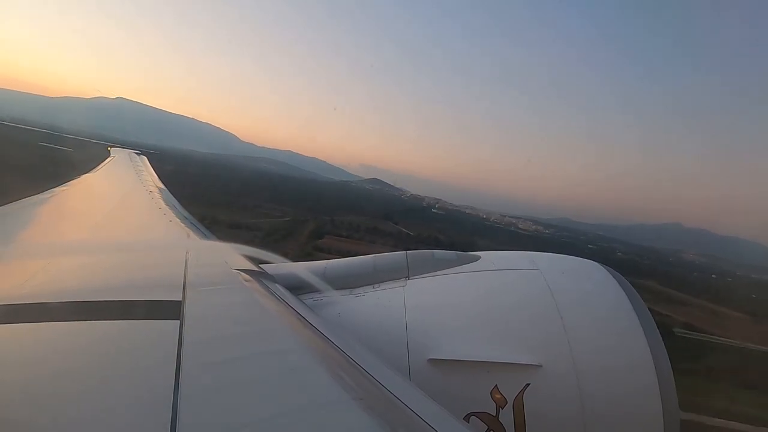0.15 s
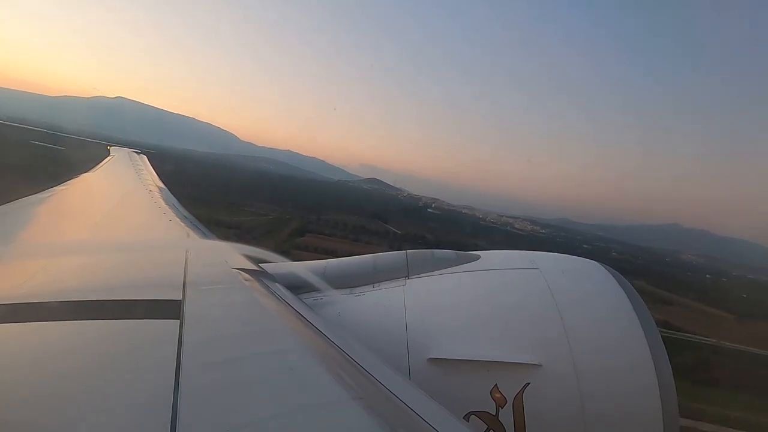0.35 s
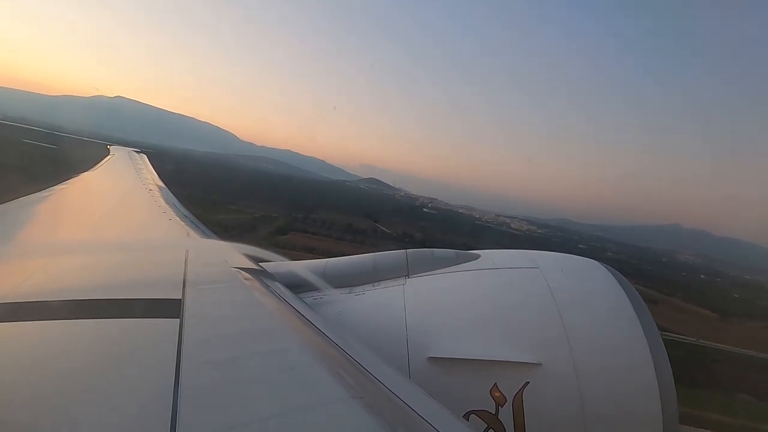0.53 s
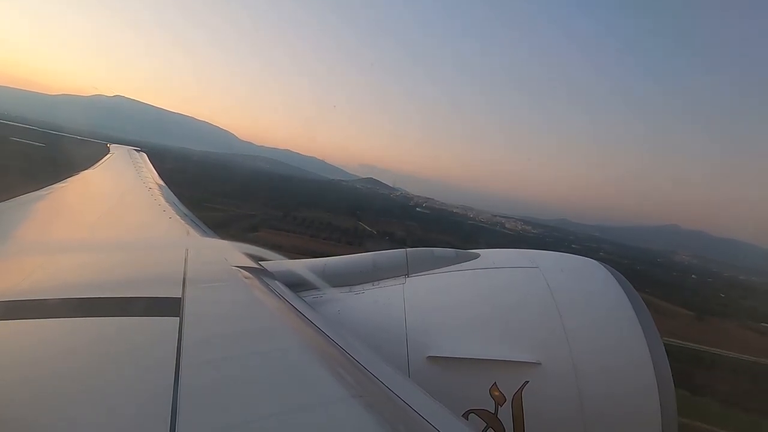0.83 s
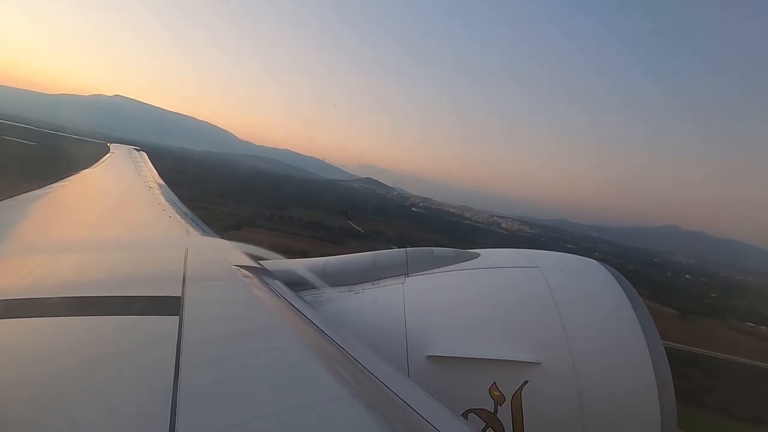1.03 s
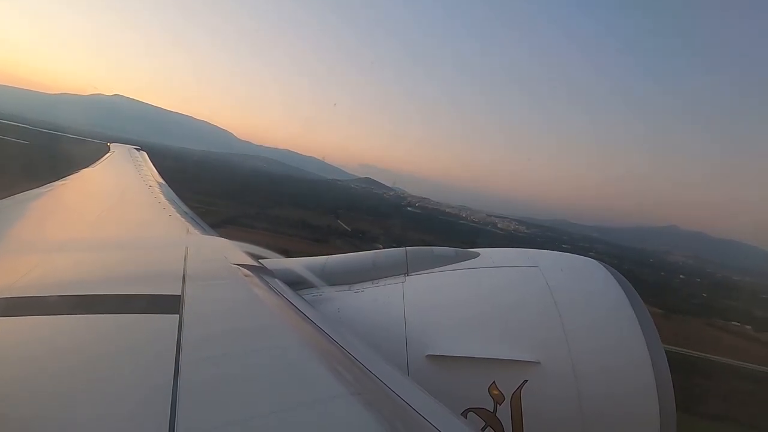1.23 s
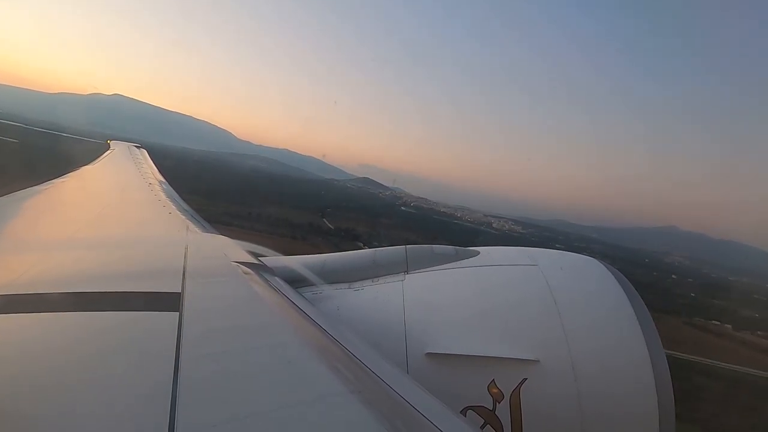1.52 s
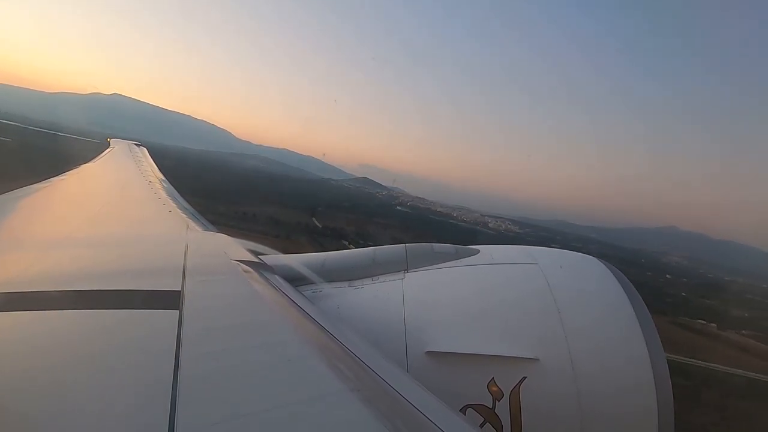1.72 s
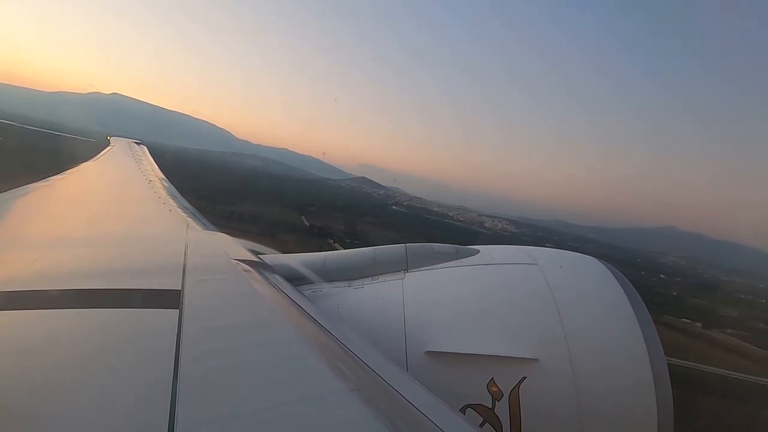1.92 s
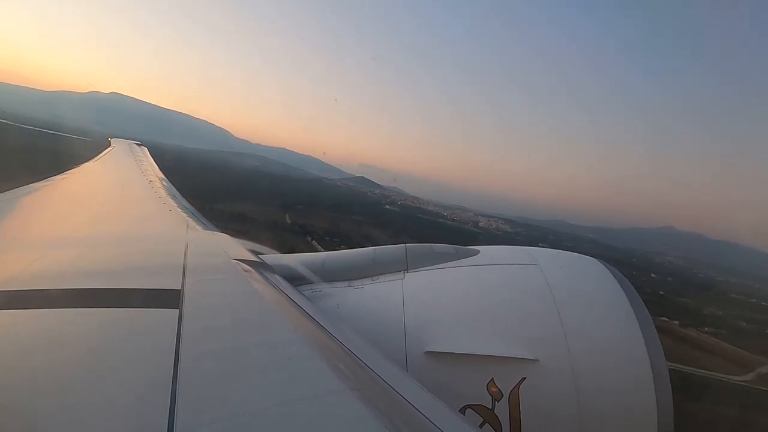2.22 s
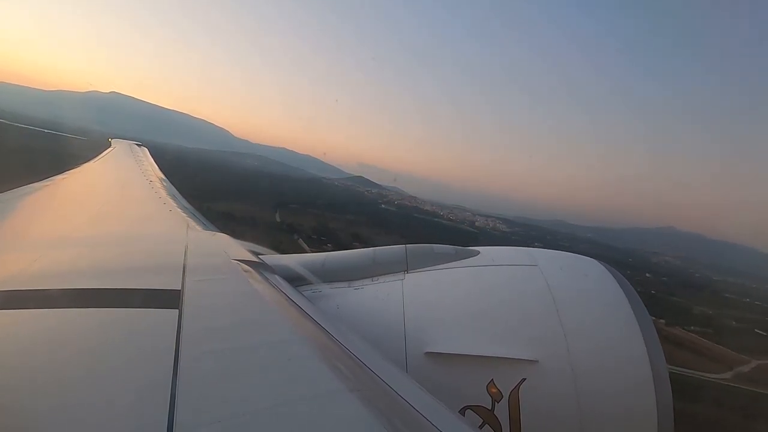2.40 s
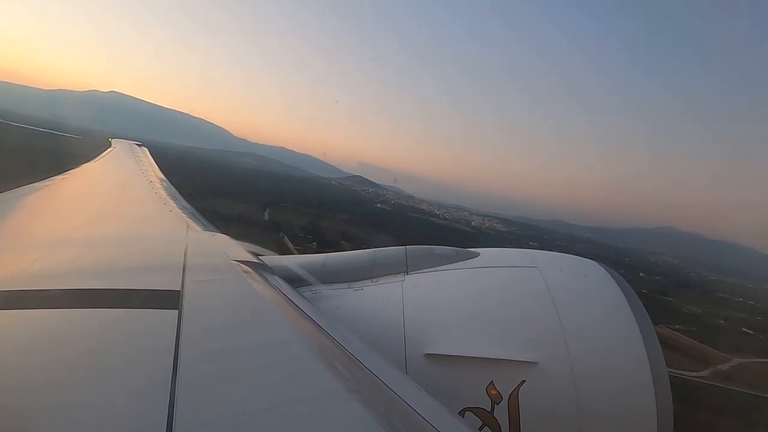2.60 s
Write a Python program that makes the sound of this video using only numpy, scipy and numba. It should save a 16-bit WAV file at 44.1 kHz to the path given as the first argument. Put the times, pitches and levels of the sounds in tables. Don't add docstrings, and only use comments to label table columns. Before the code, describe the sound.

Jet engine roar fills an aircraft cabin during climb: deep, continuous bass rumble, a softer rush of air over the skin, very faint wavering fan whine and tiny plastic ticks, captured on a phone near the window.

```python
import sys
import numpy as np
from scipy import signal
from scipy.fft import rfft, irfft
from scipy.io import wavfile
from scipy.ndimage import uniform_filter1d
from numba import njit

SR = 44100
rng = np.random.default_rng(int(sys.argv[2]) if len(sys.argv) > 2 else 0)


def transcribe(signal):
    frames = np.atleast_2d(signal).T
    limited = np.clip(frames, -1, 1)
    pcm = np.round(limited * 32767).astype(np.int16)
    wavfile.write(sys.argv[1], SR, pcm)


def attenuation_scalar(level_db):
    decades = np.asarray(level_db, float) / 20
    return 10 ** decades


N = 121275
HZ = np.arange(N // 2 + 1) * SR / N
TIME_S = np.arange(N) / SR
CROSSOVER_HZ = 900


def read(table):
    table = np.array(table, float)
    return np.interp(np.log(HZ + 1), np.log(table[:, 0]), table[:, 1])


def level(x, db):
    return x * attenuation_scalar(db) / np.sqrt(np.mean(x ** 2))


def resonance(centre_hz, width_hz):
    return 1 / (1 + (2 * (HZ - centre_hz) / width_hz) ** 2)


def walk(rate_hz):
    hold = int(SR / rate_hz)
    steps = np.repeat(rng.standard_normal(N // 200), hold)[:N + hold]
    smooth = uniform_filter1d(uniform_filter1d(steps, hold), hold)
    return smooth[:N] * np.sqrt(2)


def even(x, share, seconds):
    span = int(seconds * SR)
    power = uniform_filter1d(uniform_filter1d(np.mean(x ** 2, axis=0), span), span)
    return x * (power / power.mean() + 1e-3) ** (-share / 2)


def two_ports(likeness, lean_db, trail_rad):
    mid, side = rfft(rng.standard_normal((2, N)))
    likeness = np.clip(likeness, 0, 1)
    mid, side = mid * np.sqrt(1 + likeness), side * np.sqrt(1 - likeness)
    late = np.exp(-1j * trail_rad / 2)
    left = (mid + side) * late * attenuation_scalar(lean_db / 2)
    right = (mid - side) / late * attenuation_scalar(-lean_db / 2)
    return np.array([left, right])


def turbulence(colour_db, db, swell_db, centres_hz):
    # centre_hz, width_hz, lift_db
    panels = [(36, 11, 6), (58, 11, 4.5), (69, 8, -2), (103, 13, -1), (114.2, 9.9, 7), (134.5, 38, 7.5),
              (184.9, 18, 7.5), (241.6, 34, 4.5), (322.4, 37, 10.5), (382, 35, 3), (431.6, 14, 3),
              (453, 16, 1.5), (530, 26, 3), (788, 49, 4.5), (853, 46, -5), (912, 88, 7), (1037, 109, 6.5),
              (1152, 60, 2), (1215, 60, -3), (1550, 51, 1), (2190, 39, -2.5), (2950, 170, -2.5),
              (3400, 90, 1.5), (3580, 70, 0.5), (3520, 60, -6.5), (3870, 100, 1.5), (4270, 80, -2.5),
              (4830, 70, 1.5), (4930, 50, 1)]
    # frequency_hz, likeness (0-1)
    alike = [(60, 1), (400, .985), (620, .96), (780, .75), (950, .93), (1640, .85), (2150, .5), (2650, .72),
             (3900, .7), (4700, .05), (5400, .1), (6000, .45), (6900, .15), (7750, .45), (8200, .25),
             (9900, .42), (11000, .1)]
    # frequency_hz, lean_db
    lean = [(60, 2), (110, 1.5), (200, 1), (360, 1), (650, 1), (1180, 2.5), (2150, 2.5), (3910, 3.5),
            (7090, 6), (12900, -4)]
    # frequency_hz, phase_rad
    trail = [(100, 0), (600, .3), (780, .9), (950, .3), (1750, .2), (2700, 1.1), (3900, .4), (4300, .7),
             (7300, -.1), (8200, -1.9), (9000, -2.7), (11000, -3.1)]
    patch_db, flicker_db, patch_hz, flicker_hz = .4, .6, 3, 8.03
    bass_hz, bass_gust_share = 300, .5
    panel_db = sum(lift_db * resonance(f, width) for f, width, lift_db in panels)
    spectrum = two_ports(read(alike), read(lean), read(trail)) * attenuation_scalar(colour_db + panel_db)
    out, patch = 0, walk(patch_hz)
    for centre in centres_hz:
        away = np.clip(2 * np.log2((HZ + 1) / centre), -1, 1)
        band = irfft(spectrum * np.cos(np.pi / 2 * away) ** 2, N)
        band = even(band, .5 / (1 + (centre / bass_hz) ** 2), .12)
        patch = .8 * patch + .6 * walk(patch_hz)
        gust_db = swell_db * (1 if centre > bass_hz else bass_gust_share)
        out = out + band * attenuation_scalar(gust_db + patch_db * patch + flicker_db * walk(flicker_hz))
    return level(out, db)


def exhaust_rumble(swell_db):
    # frequency_hz, density_db (per Hz)
    colour = [(8.2, -37.5), (14, 1.5), (38, 4), (126, 0.5), (188, -2), (280, -12), (322, -12), (481, -18.5),
              (900, -29), (1170, -61.5), (1980, -120)]
    low_pass_db = -10 * np.log10(1 + (HZ / CROSSOVER_HZ) ** 8)
    return turbulence(read(colour) + low_pass_db, -13.5, swell_db, 16 * 2 ** (np.arange(15) / 2))


def air_rush(swell_db):
    # frequency_hz, density_db (per Hz)
    colour = [(530, -18.5), (900, -6), (1220, -6), (2660, -15.5), (2940, -17.5), (4030, -20.5), (4670, -23),
              (7670, -33.5), (13300, -60)]
    buffet_db, buffet_hz = .36, 24.61
    high_pass_db = 80 * np.log10((HZ + 1) / CROSSOVER_HZ) - 10 * np.log10(1 + (HZ / CROSSOVER_HZ) ** 8)
    rush = turbulence(read(colour) + high_pass_db, -41.5, swell_db, 360 * 2 ** (np.arange(12) / 2))
    return rush * attenuation_scalar(buffet_db * walk(buffet_hz))


def fan():
    # centre_hz, width_hz, lean_db (left over right)
    tones = [(826, 14, 9), (1696, 40, 2), (2110, 25, -4), (2258, 40, 4), (2589, 25, 9), (3279, 40, 7),
             (3695, 70, 7), (4048, 60, 0), (4128, 60, -1), (4400, 50, 7), (6140, 200, 6), (2058, 25, 2),
             (2725, 30, 6)]
    tone_db = [-61, -65.5, -64.5, -66.5, -69, -66.5, -70.5, -62, -62.5, -76, -68.5, -65.5, -74]
    # time_s, level_db
    grip = [(0, -3), (.42, 0), (.64, -6), (.9, -1), (1.26, -1), (1.35, -6), (1.51, -1), (1.66, -4),
            (1.71, 2.5), (1.79, -2), (1.86, 3.5), (1.93, -6), (2.06, 5), (2.11, -4), (2.34, 1), (2.45, -9),
            (2.5, 3), (2.75, 2)]
    flutter_db, flutter_hz = 1.8, 30
    grip_s, grip_db = np.array(grip).T
    grip_db = np.interp(TIME_S, grip_s, grip_db)
    out = 0
    for (f, width, lean_db), db in zip(tones, tone_db):
        main = 4000 < f < 4200
        band = irfft(two_ports(.83, lean_db, .36) * resonance(f, width), N)
        band = even(band, .8 * main, .04)
        wobble_db = flutter_db * walk(flutter_hz) * (1 - main / 2) + main * grip_db
        out = out + level(band * attenuation_scalar(wobble_db), db)
    return out


def trim_ticks():
    # start_s, peak_db, ring_hz
    ticks = [
        (.278, -37.5, 2194),
        (.398, -38.5, 2640),
        (1.052, -40, 2040),
        (1.115, -42.5, 2530),
        (1.17, -47, 1620),
        (1.983, -46, 2320),
        (2.6, -44.5, 2090),
    ]
    tick_db, crack_db, t60_s, rattle_s = -3, 1.5, .045, .008
    size = 8192
    t = np.arange(size) / SR
    crack_band = signal.butter(4, [1500, 4000], "bandpass", fs=SR, output="sos")
    out = np.zeros(N + size)
    for start_s, peak_db, ring_hz in ticks:
        rattle = rng.standard_normal(size) * np.exp(-(t / rattle_s - 1) ** 2)
        decay = np.sin(2 * np.pi * ring_hz * t) * attenuation_scalar(-60 * t / t60_s)
        ring = signal.fftconvolve(rattle, decay)[:size]
        crack = signal.sosfilt(crack_band, rattle)
        hit = ring / np.abs(ring).max() + attenuation_scalar(crack_db) * crack / np.abs(crack).max()
        start = int(start_s * SR)
        out[start:start + size] += attenuation_scalar(peak_db + tick_db) * hit
    return out[:N] * attenuation_scalar(np.array([[2.5], [-2.5]]))


def scene():
    # time_s, level_db
    gust = [(0, 0), (.45, -.3), (.75, 1), (1, .5), (1.1, 0), (1.9, -.5), (2.4, -.6), (2.75, -.3)]
    gust_s, gust_db = np.array(gust).T
    swell_db = .9 * np.interp(TIME_S, gust_s, gust_db - gust_db.mean())
    return exhaust_rumble(swell_db) + air_rush(swell_db) + fan() + trim_ticks()


def microphone(dry):
    # centre_hz, width_hz, left_db, right_db
    cavities = [(3600, 1100, 2.5, -1), (7100, 1000, 0, 4.5), (7820, 950, 3.5, -1), (8500, 420, -7, -2.5),
                (9400, 1100, 4.5, 2), (11600, 600, 0, 6), (12100, 1400, 6, 3.5)]
    low_cut_hz = 8.2
    lift_db = sum(np.array([[left], [right]]) * resonance(f, width) for f, width, left, right in cavities)
    low_cut = HZ ** 2 / np.hypot(HZ ** 2, low_cut_hz ** 2)
    return irfft(rfft(dry) * attenuation_scalar(lift_db) * low_cut, N)


@njit
def follow(x, up, down):
    e, out = np.mean(x), np.empty(len(x))
    for i in range(len(x)):
        e += (x[i] - e) * (up if x[i] > e else down)
        out[i] = e
    return out


def phone_gain(heard):
    split_hz, treble_share = 420, .13
    ceiling_db, ratio, attack_s, release_s, knee = -20, 4, .004, .025, 1.6
    bass = irfft(rfft(heard) / (1 + (HZ / split_hz) ** 4), N)
    envelope = follow(np.abs(bass).max(axis=0), 1 / (attack_s * SR), 1 / (release_s * SR))
    gain = np.minimum(attenuation_scalar(ceiling_db) / envelope, 1) ** (1 - 1 / ratio)
    gain = gain / gain.mean()
    return np.tanh(knee * bass * gain) / knee + (heard - bass) * gain ** treble_share


def band_limit(x):
    return signal.sosfilt(signal.butter(12, 13480, fs=SR, output="sos"), x)


def record(dry):
    return band_limit(phone_gain(microphone(dry)))


dry = scene()
out = record(dry)
transcribe(out)
```